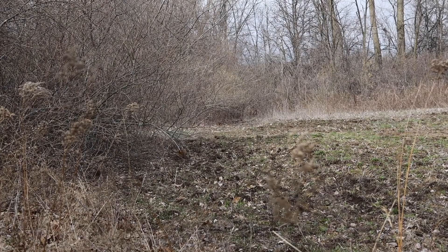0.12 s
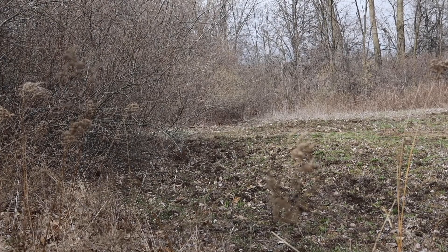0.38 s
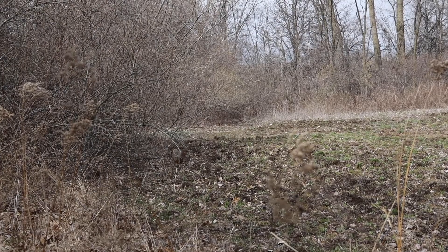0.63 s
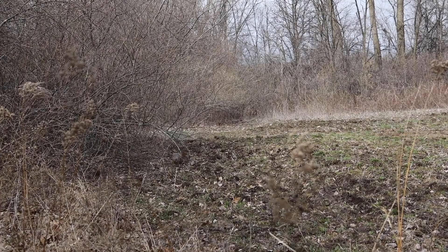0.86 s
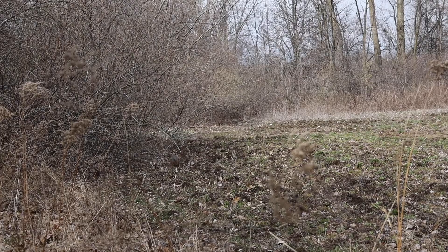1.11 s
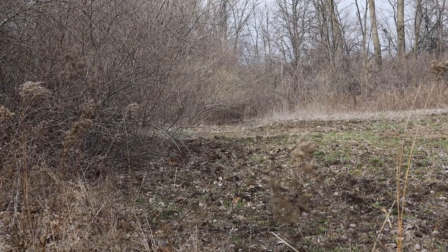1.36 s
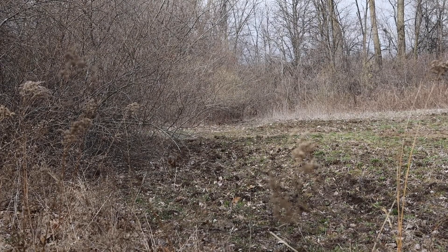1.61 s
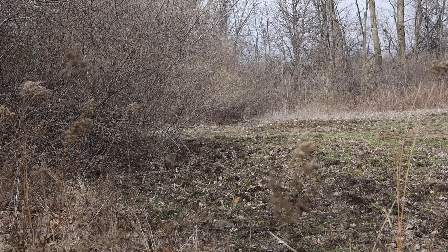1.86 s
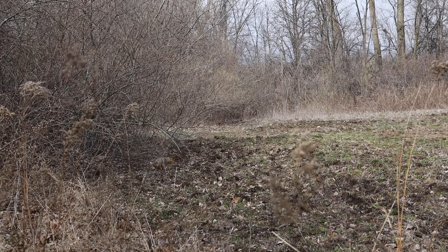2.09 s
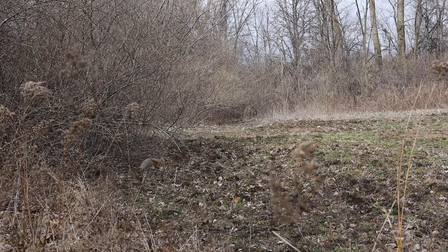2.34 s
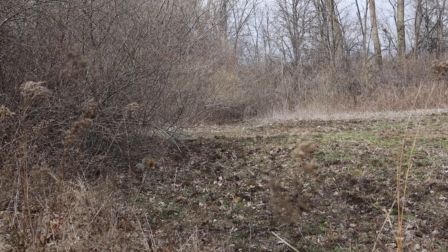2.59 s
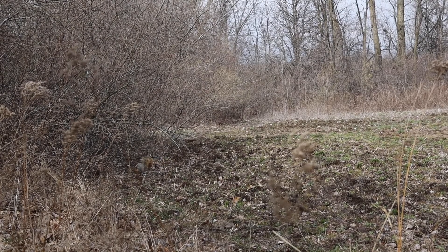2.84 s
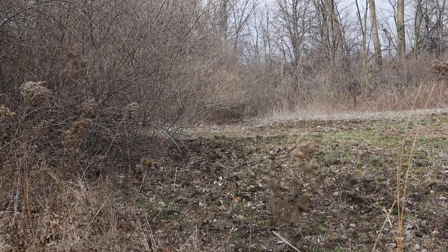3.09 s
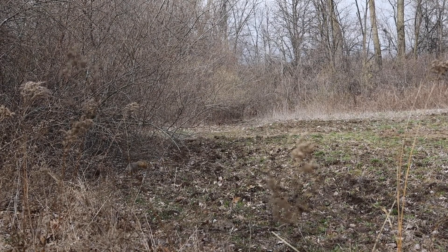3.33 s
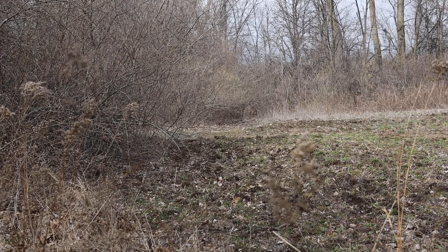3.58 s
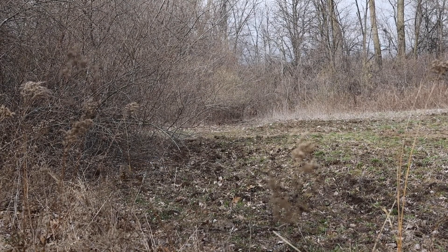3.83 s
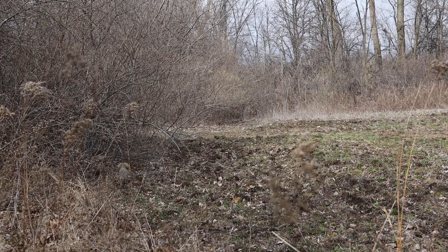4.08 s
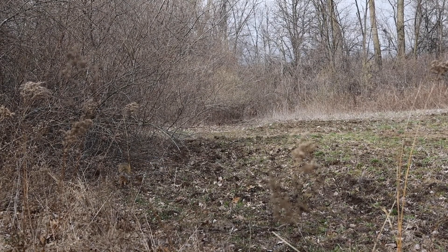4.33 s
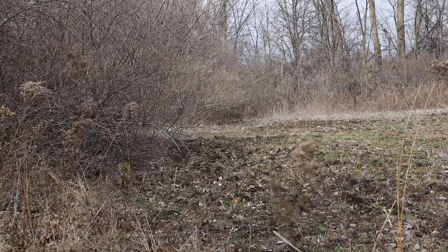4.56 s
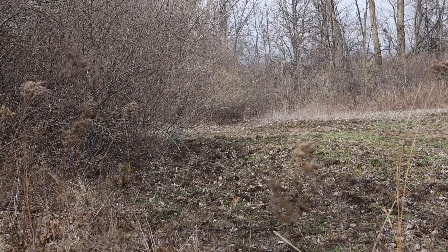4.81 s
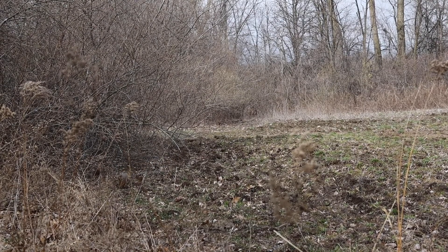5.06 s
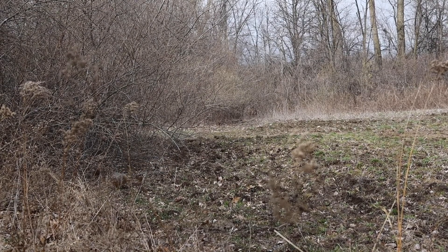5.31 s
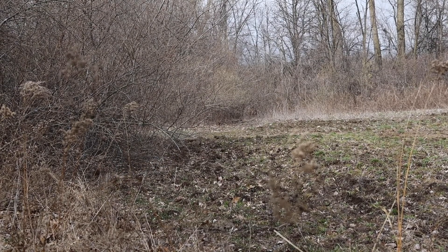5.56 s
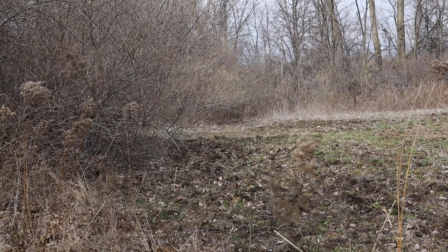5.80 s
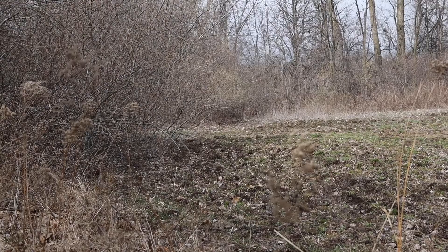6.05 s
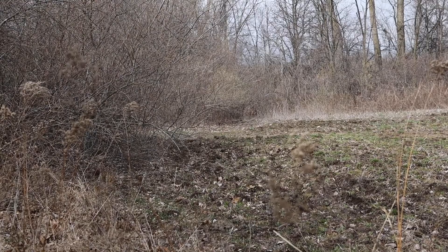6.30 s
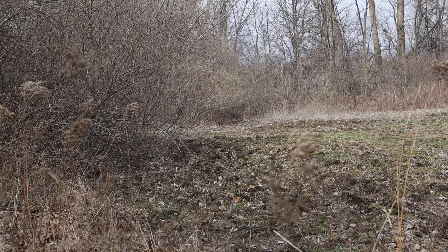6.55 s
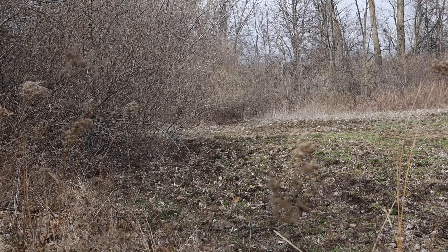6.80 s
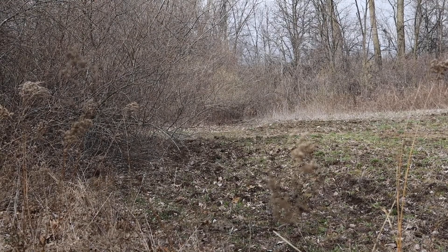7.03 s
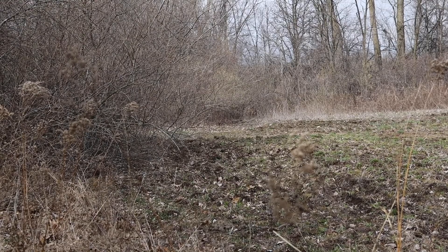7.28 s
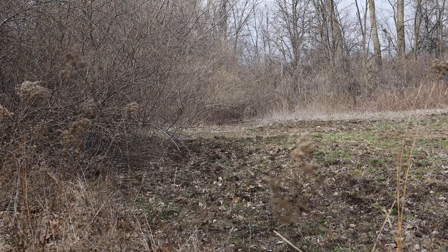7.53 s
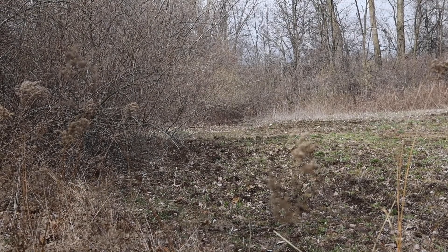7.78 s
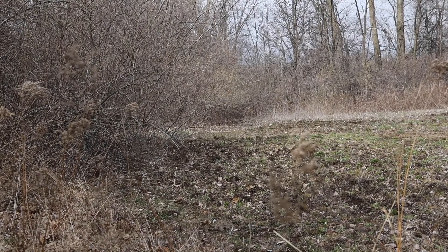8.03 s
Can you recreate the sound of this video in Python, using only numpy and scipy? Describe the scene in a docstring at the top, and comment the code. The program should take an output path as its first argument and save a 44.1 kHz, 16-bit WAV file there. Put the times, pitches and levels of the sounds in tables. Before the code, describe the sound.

Close, dry and bright turkey-call clucks stand far above a faint outdoor bed. The peg knocks, then skids for about a tenth of a second, giving a hollow yelping chirp with gritty scrape. Three come at roughly one-second intervals, then after a gap two more, the last loudest and breaking lower. Behind them are fuzzy high birds, a fast far trill, cloth-like rustle, tiny ticks, air hiss, low hum and woodland echo.

```python
"""Air hiss, a low distant drone, dry rustling with ticks and fuzzy far whistles open a field edge.
A peg taps the plate of a hand-held friction turkey call, then skids: five near clucks, each a stack of
slip harmonics shaped by the body, plus scrape and hiss. The tree line answers with a long faint echo;
a far trill of falling notes follows the first cluck. Gain control ducks everything under the strokes."""
import sys
import numpy as np
from scipy import signal
from scipy.fft import rfft, irfft
from scipy.io import wavfile
from scipy.ndimage import uniform_filter1d

SR = 44100
rng = np.random.default_rng(int(sys.argv[2]) if len(sys.argv) > 2 else 0)


def voltage_ratio(level):
    """Linear amplitude factor for a level in decibels (scalar or array-like)."""
    return 10 ** (np.asarray(level, float) / 20)


def bounce(signal):
    """Save signal as a 16-bit WAV file at the path given by the first command-line argument."""
    frames = np.transpose(np.atleast_2d(signal))
    limited = np.clip(frames, -1, 1)
    pcm = np.round(limited * 32767).astype(np.int16)
    wavfile.write(sys.argv[1], SR, pcm)


N = 359415
TIME = np.arange(N) / SR

# Modes of the call. Each row: centre in Hz, width in Hz, relative level in dB.
MODES = [(936.5, 43, 12.5), (1330, 176, 14.5), (1563, 164, 14), (1890, 140, -32), (2311, 89, -19),
         (2980, 590, -37.5), (3290, 950, -25), (4240, 370, -13), (4400, 250, -12.5), (7800, 3900, -34),
         (6000, 2100, -35.5)]
# The peg catches and tears loose. Each row: time in seconds, scrape in dB, hum before filtering in dB.
CATCH_EVENTS = [(1.023, -36, -30), (1.053, -23, -18.5), (1.128, -35, -33.5), (2.204, -30.5, -21),
                (2.219, -15.5, -15.5), (2.235, -16.5, -29.5), (2.288, -20.5, -30.5), (3.389, -32.5, -33),
                (3.401, -24.5, -18), (5.118, -17, -9), (5.127, -26, -12), (5.792, -27.5, -17.5),
                (5.804, -20, -16), (5.814, -28, -14), (5.844, -15, -20.5), (5.874, -21.5, -29)]


def evened(x):
    """Scales to rms 1."""
    return x / np.sqrt(np.mean(x ** 2) + 1e-20)


def read(points, hz):
    """Interpolates a table of (Hz, value) along log frequency."""
    f, value = np.transpose(points)
    return np.interp(np.log(hz + 1), np.log(f + 1), value)


def curve(points):
    """Interpolates a table of (s, value) over the whole scene."""
    return np.interp(TIME, *np.transpose(points))


def add(mix, s, sound):
    """Adds a sound into the mix at s seconds."""
    part = mix[round(s * SR):][:len(sound)]
    part += sound[:len(part)]


def coloured(x, points):
    """Filters by a spectrum of (Hz, dB)."""
    return irfft(rfft(x) * voltage_ratio(read(points, np.fft.rfftfreq(len(x), 1 / SR))), len(x))


def fuzzy(hz, width, size):
    """A tone whose height and phase wander within a bandwidth in Hz; rms 1."""
    r = np.exp(-np.pi * width / SR)
    noise = rng.standard_normal((size + 9000, 2)) @ [1, 1j]
    wander = signal.lfilter([1], [1, -r], noise)[9000:]
    carrier = np.exp(2j * np.pi * np.cumsum(hz * np.ones(size)) / SR)
    return np.sqrt(1 - r * r) * (wander * carrier).real


def bumps(t, at, rise, fall):
    """Lopsided bells of height 1: a rise before each time, a fall after it."""
    late = t - np.reshape(at, (-1, 1))
    width = np.where(late < 0, np.reshape(rise, (-1, 1)), np.reshape(fall, (-1, 1)))
    return np.exp(-(late / width) ** 2)


def air():
    """Steady air and microphone hiss: noise with a fixed spectrum."""
    # Each row: frequency in Hz, relative density in dB per Hz.
    air_spectrum = [(25, -8), (96, 0.5), (152, -17.5), (184, -10.5), (449, -21.5), (729, -20), (1180, -30),
                    (1930, -40.5), (3050, -45), (5520, -40.5), (15800, -39.5)]
    return voltage_ratio(-47.5) * evened(coloured(rng.standard_normal(N), air_spectrum))


def drone():
    """Far drone: tones wandering in narrow bands; the lowest is partly steady and swells."""
    # Each row: centre in Hz, width in Hz, level in dB (before the swell in the first row).
    drone_tones = [(91.5, 4.6, -48.5), (127.7, 9.2, -52), (183.7, 19, -53.5)]
    # Swell of the lowest tone, of which only the departure from the mean counts.
    # Each row: time in seconds, level in dB.
    drone_swell = [(0.0, -48), (1.45, -54), (1.7, -40), (2.29, -51.5), (2.6, -54), (8.15, -53.5)]
    tones = [voltage_ratio(db) * fuzzy(hz, width, N) for hz, width, db in drone_tones]
    lowest_hz, _, lowest_db = drone_tones[0]
    steady = voltage_ratio(lowest_db) * np.sin(2 * np.pi * lowest_hz * TIME)
    lowest = .7 * tones[0] + steady
    swell_db = curve(drone_swell)
    return lowest * voltage_ratio(swell_db - swell_db.mean()) + sum(tones[1:])


def rustle():
    """Dense clumped grains of dry stalks and cloth, and thin treble ticks at random."""
    # Each row: frequency in Hz, relative density in dB per Hz.
    rustle_spectrum = [(530, -39.5), (900, -9.5), (2380, -5), (3980, -1), (5980, -10.5), (14000, -21.5)]
    # Bouts. Each row: peak in seconds, swell in seconds, fade in seconds, peak before clumping in dB.
    bouts = [(0.181, 0.58, 0.58, -53), (2.898, 0.87, 0.7, -68.5), (6.099, 0.11, 0.063, -67),
             (7.36, 0.07, 0.2, -55.5), (7.66, 0.15, 0.25, -55), (8.04, 0.043, 0.12, -63.5)]
    floor_db = -67.5
    snaps_per_s, snap_db = 10, -62
    heights = voltage_ratio(2 * np.minimum(rng.exponential(1, N), 5))
    grains = heights * (rng.random(N) < 12000 / SR) * rng.choice([-1, 1], N)
    clumps = evened(uniform_filter1d(rng.standard_normal(N), 900))
    at, swell, fade, db = np.transpose(bouts)
    level = voltage_ratio(floor_db) + voltage_ratio(db) @ bumps(TIME, at, swell, fade)
    out = level * voltage_ratio(1.2 * clumps) * evened(coloured(grains, rustle_spectrum))
    snaps = voltage_ratio(snap_db + 3 * rng.standard_normal(N)) * (rng.random(N) < snaps_per_s / SR)
    snap_level = np.sqrt(signal.lfilter([1], [1, -.99], snaps ** 2))
    return out + snap_level * evened(coloured(grains, [(3000, -25), (8000, 0)]))


def ticks():
    """Dry ticks close by: short band-shaped noise dying 60 dB in 42 ms."""
    # Each row: start in seconds, peak before a 9.5 dB cut in dB, centre in Hz.
    near_ticks = [(0.1192, -29.5, 3940), (0.196, -20, 4400), (0.4423, -20.5, 4650), (1.3014, -32.5, 2460),
                  (1.4568, -34, 3200), (6.146, -36, 3880), (7.12, -22, 2950), (8.071, -37, 6240)]
    out = np.zeros(N)
    t = np.arange(900) / SR
    for s, db, hz in near_ticks:
        band = [(hz / 4, -25), (hz, 0), (hz * 2.0, -12), (16000, -35)]
        tick = coloured(rng.standard_normal(len(t)), band) * voltage_ratio(-60 * t / 0.042)
        add(out, s, voltage_ratio(db - 9.5) * tick / abs(tick).max())
    return out


def whistles():
    """Far gliding whistles: a sine plus a fuzzy copy, broken up by slow level noise."""
    # Each row: start in seconds, end in seconds, start in Hz, end in Hz, sine peak before break-up in dB.
    whistle_notes = [(.37, 0.694, 3558, 3333, -59.5), (.64, 0.674, 4410, 4200, -58),
                     (0.747, 1.03, 3694, 3357, -53.5), (.96, 0.994, 4330, 4220, -58),
                     (1.138, 1.313, 3610, 3330, -61.5), (1.318, 1.528, 3760, 3534, -57.5),
                     (1.522, 1.622, 2826, 2743, -65), (1.542, 1.693, 3663, 3740, -52),
                     (6.55, 6.85, 2480, 2330, -74), (3.567, 3.844, 3510, 3506, -69),
                     (3.95, 4.386, 3110, 3090, -74.5)]
    out = np.zeros(N)
    for s0, s1, hz0, hz1, db in whistle_notes:
        size = round((s1 - s0) * SR)
        hz = np.linspace(hz0, hz1, size)
        note = np.sin(2 * np.pi * np.cumsum(hz) / SR) + .45 * fuzzy(hz, 60, size)
        # gusts break the tone up
        note *= voltage_ratio(3 * evened(uniform_filter1d(rng.standard_normal(size), 700)))
        add(out, s0, voltage_ratio(db) * note * signal.windows.tukey(size, .4))
    return out


def echo(x, start, stretch):
    """Sparse taps of random sign from trunks and brush, each band dying at its own speed."""
    # Tree line. Each row: frequency in Hz, 60 dB decay in seconds before stretching.
    tree_decay = [(500, 0.19), (1100, 1.8), (1600, 1.7), (3000, 2.8), (8000, 2.2)]
    taps_line = np.zeros(2 * SR)
    at = np.arange(start, 2 * SR - 20, 20)
    taps_line[at + rng.integers(0, 20, len(at))] = rng.choice([-1., 1.], len(at))
    hz, t, z = signal.stft(taps_line, SR, nperseg=256)
    decay = voltage_ratio(-60 * t / (stretch * read(tree_decay, hz)[:, None]))
    tail = signal.istft(z * decay, SR, nperseg=256)[1]
    return signal.fftconvolve(x, tail / np.linalg.norm(tail))[:N]


def body(hz):
    """Complex response of all modes; the small body radiates no bass and its top is damped."""
    hollow_hz, hollow_width_hz, hollow_db = 2780, 260, -4.5
    hz = hz + 1e-3
    modes = 0
    for k, (f, width, db) in enumerate(MODES):
        modes = modes + (-1) ** k * voltage_ratio(db) / (1 + 1j * (hz ** 2 - f ** 2) / (hz * width))
    # the plate moves little between its mode groups
    modes *= voltage_ratio(hollow_db * np.exp(-((hz - hollow_hz) / hollow_width_hz) ** 2))
    bass_cut = (1 - (520 / hz) ** 2 + 480 / (1j * hz)) ** 3
    return modes / bass_cut / (1 + 1j * hz / 7000) ** 2


def ring(x):
    """The body rung by a force."""
    size = len(x) + 4096
    return irfft(rfft(x, size) * body(np.fft.rfftfreq(size, 1 / SR)), size)


def taps():
    """The peg lands on the plate: a click and a brief noisy skid ring the body, with a hiss."""
    # Each row: start in seconds, knock peak before hiss in dB.
    landings = [(0.483, -41.5), (2.033, -24.5), (3.235, -31.5), (4.953, -41), (5.029, -23.5), (5.745, -14)]
    skid_s, grit_db = .009, -26
    hiss_spectrum = [(1500, -33.5), (2500, -5.0), (4500, -0.5), (6000, -15.5), (12000, -25.0)]
    out = np.zeros(N)
    t = np.arange(2000) / SR
    for s, db in landings:
        force, noise = rng.standard_normal((2, len(t)))
        skid = 0.22 * force * np.exp(-(t / skid_s) ** 2)
        add(skid, 0, signal.windows.hann(11))
        knock = ring(skid)
        knock /= abs(knock).max()
        hiss = evened(coloured(noise, hiss_spectrum)) * np.exp(-t / .008)
        add(knock, 0, voltage_ratio(grit_db) * hiss)
        add(out, s, voltage_ratio(db) * knock)
    return out


def catch_hum(t):
    """The lowest mode hums, partly fuzzy, around each catch of the peg."""
    rise_s, fall_s, fuzz = .0042, .0055, .3
    at, _, hum_db = np.transpose(CATCH_EVENTS)
    hz = MODES[0][0]
    tone = np.sin(2 * np.pi * hz * t) + fuzz * fuzzy(hz, 61, len(t))
    hum = voltage_ratio(hum_db) @ bumps(t, at, rise_s, fall_s) * tone
    return coloured(hum, [(550, -31.5), (740, 1)])


def scrape_level(t, tone_db, grit_db):
    """Amplitude of the scrape: a steady part that follows the tone plus a burst at each catch."""
    at, db, _ = np.transpose(CATCH_EVENTS)
    return voltage_ratio(tone_db + grit_db) + voltage_ratio(db) @ bumps(t, at, .0049, .0085)


def stray_slips(scrape):
    """Random slips, 1500 per second, ring the modes freely."""
    size = len(scrape)
    slips = (rng.random(size) < 1500 / SR) * rng.standard_normal(size)
    return ring(slips * scrape * voltage_ratio(6.5)) / ring(slips)[:size].std()


def peg_hiss(scrape, upper_db, rough, unsteady):
    """The peg hisses on the plate, most while it scrapes; catches spit treble."""
    size = len(scrape)
    hiss_spectrum = [(1500, -39.0), (2500, 2), (4200, 17.5), (5500, 1.0), (7500, 3.0), (15000, -18.5)]
    grit = coloured(rng.standard_normal(size), hiss_spectrum)
    hiss = voltage_ratio(upper_db - 23 + 9 * rough + 90 * unsteady) * evened(grit)
    return hiss + voltage_ratio(-27) * scrape * evened(np.gradient(rng.standard_normal(size)))


def slip_tone(tone_db, upper_db, hz, rough, unsteady):
    """Regular slips give a harmonic stack shaped by the body; rough or slow slips shake it."""
    first_db, first_db_per_hz, first_hold_db_per_db, slow_first_db = -11.5, 0.108, 0.33, 20
    second_db, uneven_db = 10, 3.5
    tilt_db_per_order, soft_tilt_db_per_order_per_db = -0.32, .07
    noise = rng.standard_normal((21, len(hz)))
    wobble = signal.oaconvolve(noise, np.hanning(260)[None], "same") / 10
    order = np.arange(1, 22)[:, None]
    # the body follows a jump in rate with some lag
    gains = uniform_filter1d(abs(body(order * hz)), 130, axis=1)
    slow = np.clip((630 - hz) / 80, 0, 1)  # slow slips stumble
    # the weak fundamental grows with slip rate, resists fading and comes out in the slowest slips
    rate_db = first_db_per_hz * (hz - 698)
    gains[0] = voltage_ratio(slow_first_db * slow + first_db + rate_db - first_hold_db_per_db * tone_db)
    gains[1] *= voltage_ratio(second_db)  # the plate swings twice between slips
    # rough slips shake the partials; the upper ones also flicker
    shake_rad = unsteady + .07 * rough + .1 * slow * (order > 2)
    shake = shake_rad * (order - .5) * wobble + order ** 2
    flicker_db = (32 * unsteady + 3.5 * slow) * (order[1:] > 2)
    gains[1:] *= voltage_ratio(flicker_db * wobble[:0:-1])
    gains[2:] *= voltage_ratio(30 * unsteady * evened(uniform_filter1d(wobble[2:], 900, axis=1)))
    # light pressure dulls the top
    soft_db = np.minimum(upper_db - upper_db.max(), 0)
    tilt_db = tilt_db_per_order + soft_tilt_db_per_order_per_db * soft_db
    gains *= voltage_ratio(tilt_db * np.maximum(order - 6, 0))
    # each upper partial has its own strength
    gains[6:] *= voltage_ratio(uneven_db * rng.standard_normal((len(order) - 6, 1)))
    phase = 2 * np.pi * order * np.cumsum(hz) / SR + shake
    partials = np.sqrt(2) * (gains * np.exp(1j * phase)).real
    upper = np.clip((order * hz - 1720) / 120, 0, 1)
    low = (partials * (1 - upper)).sum(0) / np.linalg.norm(gains * (1 - upper), axis=0)
    high = (partials * upper).sum(0) / np.linalg.norm(gains * upper, axis=0)
    return voltage_ratio(tone_db) * low + voltage_ratio(upper_db) * high


def stroke(rows, grit_db, bright_db, unsteady):
    """One skid of the peg: slip tone, hiss, hum and stray slips driven by one pressure curve."""
    upper_lag_s, upper_share = 0.0046, 0.88
    s, *columns = np.transpose(rows)
    t = np.arange(s[0], s[-1], 1 / SR)
    tone_db, hz = (np.interp(t, s, c) for c in columns)
    scrape = scrape_level(t, tone_db, grit_db)
    # upper partials follow pressure late and in part
    r = np.exp(-1 / (upper_lag_s * SR))
    late_db = signal.lfilter([1 - r], [1, -r], tone_db - tone_db[0]) + tone_db[0]
    upper_db = bright_db + upper_share * late_db
    # roughness grows as the scrape nears the tone
    rough = np.clip((20 * np.log10(scrape) - tone_db + 32) / 20, 0, 1)
    voiced = slip_tone(tone_db, upper_db, hz, rough, unsteady)
    voiced += peg_hiss(scrape, upper_db, rough, unsteady) + catch_hum(t)
    out = stray_slips(scrape)
    add(out, 0, voiced * signal.windows.tukey(len(t), .12))
    return s[0], out


def strokes():
    """The five clucks, each with its own grip."""
    # One table a stroke. Each row: time in seconds, tone level set by pressure in dB, slip rate in Hz.
    peg_paths = [
        [(1.012, -51.5, 768), (1.036, -15.5, 774.5), (1.053, -4, 775), (1.068, 0.5, 732.3), (1.092, -1, 731.7),
         (1.114, -0.5, 695), (1.122, -14.5, 656), (1.131, -9.5, 648), (1.15, -47.5, 641.5)],
        [(2.196, -35, 830), (2.208, -24, 805.7), (2.211, -11.5, 799.4), (2.214, -18.5, 762), (2.218, 2, 754),
         (2.228, 4.5, 725.6), (2.232, -8.5, 737.3), (2.24, 5, 807.7), (2.282, 0.5, 785.6), (2.29, -15.5, 695.3),
         (2.297, -9.5, 643), (2.308, -12.5, 671.3), (2.322, -40.5, 660)],
        [(3.381, -41, 760.5), (3.396, -12.5, 807.3), (3.3995, -34.5, 756.7), (3.403, -3.5, 754),
         (3.414, 4, 719.5), (3.424, -4, 724.7), (3.446, 2, 677.3), (3.455, 0, 642), (3.476, -7, 645.5),
         (3.485, -8, 632), (3.499, -16.5, 658.5), (3.507, -7.5, 683), (3.517, -32, 684), (3.532, -34.5, 702)],
        [(5.094, -55, 757), (5.106, -35, 759), (5.114, -9, 743.7), (5.128, 5, 759.8), (5.138, 2.5, 738.4),
         (5.168, 2, 731.8), (5.207, -11, 732), (5.216, -22.5, 723), (5.237, -21.5, 778), (5.248, -46, 746)],
        [(5.786, -28, 795.5), (5.799, -16, 791), (5.8065, -1, 822), (5.809, 2, 830), (5.819, 8, 761),
         (5.838, 5.5, 746.5), (5.84, -7, 542), (5.857, -6.5, 558), (5.866, -10.5, 547), (5.876, -10, 522),
         (5.883, -23.5, 539.6), (5.91, -32.5, 574)],
    ]
    # Each row, one a stroke: steady scrape re tone in dB, upper partials re tone in dB.
    peg_grips = [(-28, -18), (-26, -17.5), (-32.5, -14), (-32.5, -16), (-30.5, -15)]
    # One value a stroke: unsteadiness of the slips in radians per partial.
    peg_shakes = [.06, .075, .095, .035, .055]
    out = np.zeros(N)
    for rows, grip, unsteady in zip(peg_paths, peg_grips, peg_shakes):
        add(out, *stroke(rows, *grip, unsteady))
    return out


def trill():
    """Far trill of fast notes, each dropping steeply and then hooking up a little."""
    # Each row: time in seconds, level before note accents in dB.
    trill_level = [(1.719, -49.5), (2.0, -51), (2.3, -52), (2.62, -61)]
    notes_per_s, blur_hz = 13.7, 60
    start_s, end_s = trill_level[0][0], trill_level[-1][0]
    count = (TIME - start_s) * notes_per_s
    u = count % 1  # place within the note
    pitch, force = rng.standard_normal((200, 2))[count.astype(int)].T
    hz = 2900 + 30 * pitch - 170 * (TIME - 1) + 1650 * np.exp(-(u / .19) ** 1.8) + 1100 * u
    shape = np.clip(.6 + 1.5 * u, 0, 1) * np.clip(u / .05, 0, 1) * np.clip((.62 - u) / .15, 0, 1)
    sing = voltage_ratio(1.5 * force) * shape * (TIME > start_s) * (TIME < end_s)
    tone = np.sin(2 * np.pi * np.cumsum(hz) / SR) + .4 * fuzzy(hz, blur_hz, N)
    return voltage_ratio(curve(trill_level)) * sing * tone


def scene():
    """Near call and far birds with their echoes, over rustling, ticks, air and drone."""
    # The call heard from behind, far off. Each row: frequency in Hz, gain in dB.
    far_dulling = [(700, -10.5), (1100, 3.5), (1550, -15.5), (2300, -18.5), (3500, -26)]
    call = taps() + strokes()
    dulled = coloured(call, far_dulling)
    # the far tree line sends one late bunch of echoes
    late_return = voltage_ratio(-35) * echo(dulled, round(.38 * SR), 0.31)
    near_echo = voltage_ratio(-23.5) * echo(call, 400, 0.099)
    long_echo = voltage_ratio(-39.5) * echo(dulled, 2200, 0.87)
    near = call + late_return + near_echo + long_echo
    birds = whistles() + trill()
    far = birds + .9 * echo(birds, 150, .17)
    return (near + far + rustle() + ticks() + air() + drone())[None]


def top_cut(x):
    """Nothing passes above the cut-off."""
    return signal.sosfilt(signal.butter(12, 15840, fs=SR, output="sos"), x)


def record(dry):
    """The microphone cuts the deepest bass; gain control follows the strokes late, then lets go."""
    lag_s, release_db_per_s = .015, 90
    heard = signal.lfilter(*signal.butter(2, 38, "high", fs=SR), dry)
    r = np.exp(-1 / (lag_s * SR))
    power_db = 10 * np.log10(signal.lfilter([1 - r], [1, -r], heard[0] ** 2) + 1e-12)
    fall_db = release_db_per_s * TIME
    # half the excess over -21 dB is cut; the running maximum makes a linear release
    cut_db = np.maximum.accumulate(.5 * np.maximum(power_db + 21, 0) + fall_db) - fall_db
    return top_cut(np.clip(heard * voltage_ratio(-cut_db), -1, 1))


dry = scene()
out = record(dry)
bounce(out)
```